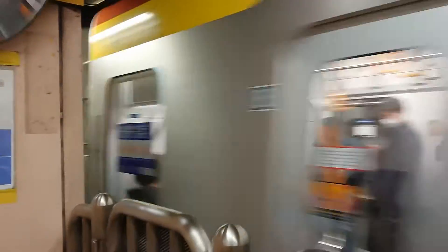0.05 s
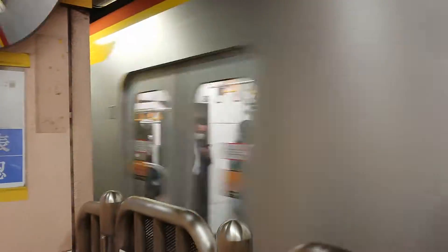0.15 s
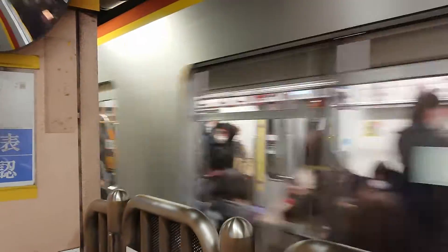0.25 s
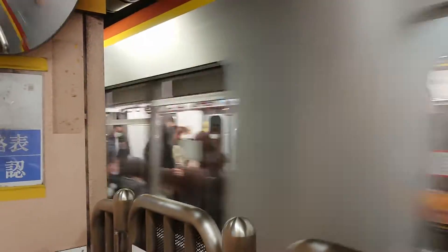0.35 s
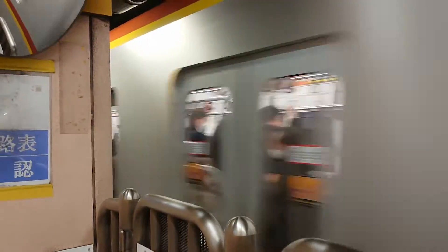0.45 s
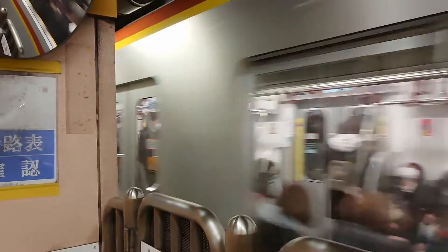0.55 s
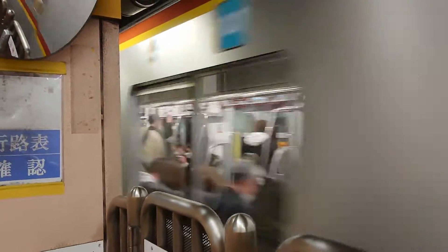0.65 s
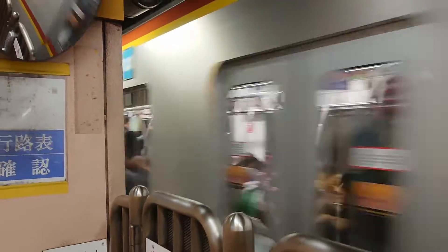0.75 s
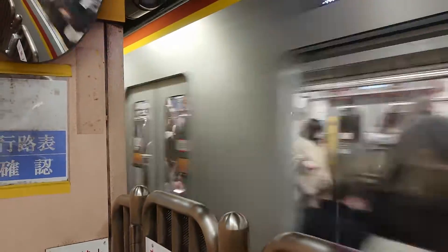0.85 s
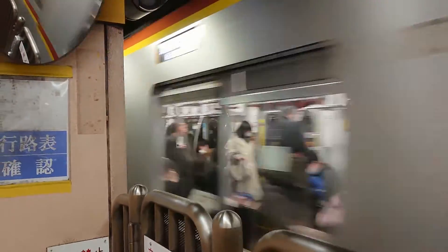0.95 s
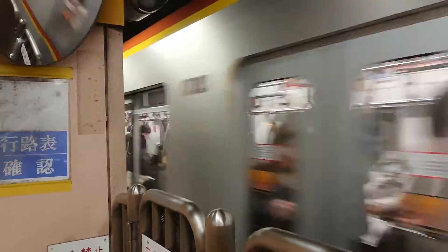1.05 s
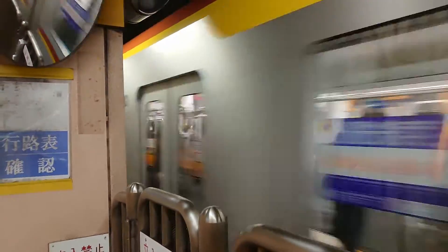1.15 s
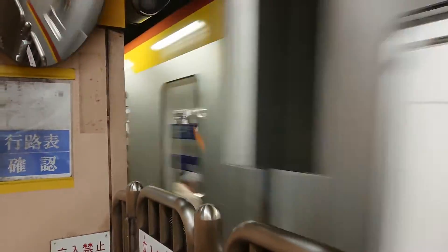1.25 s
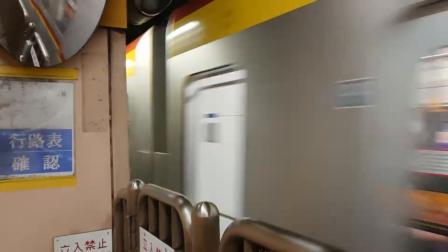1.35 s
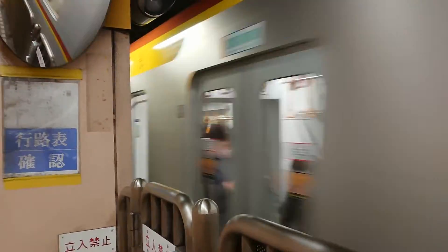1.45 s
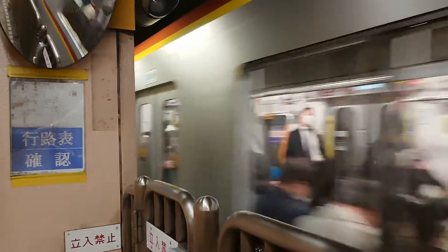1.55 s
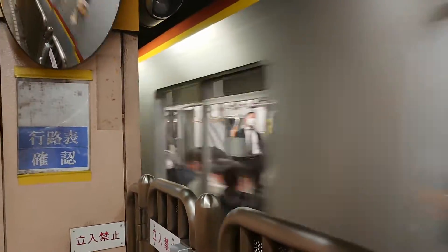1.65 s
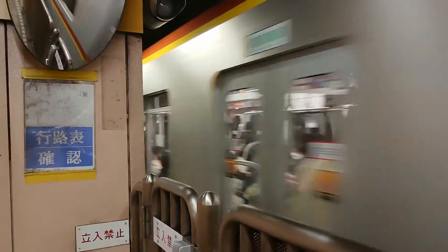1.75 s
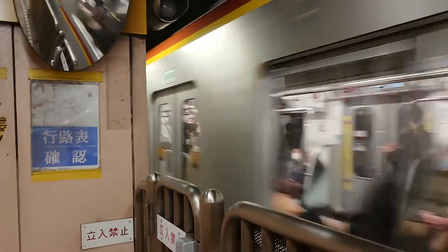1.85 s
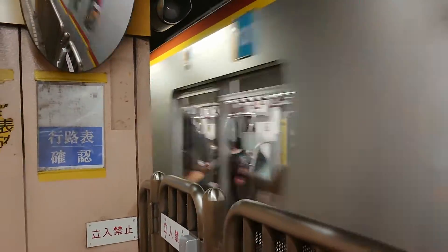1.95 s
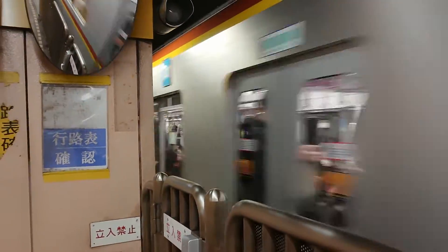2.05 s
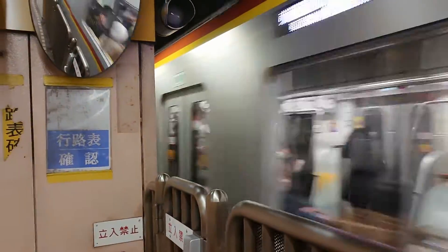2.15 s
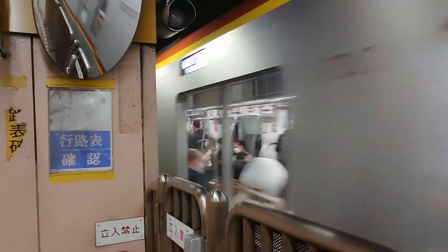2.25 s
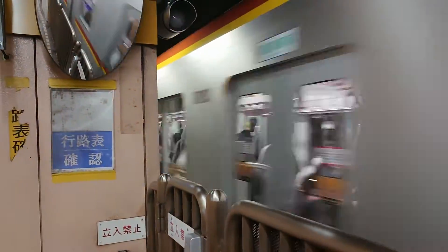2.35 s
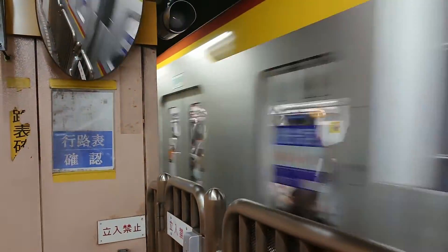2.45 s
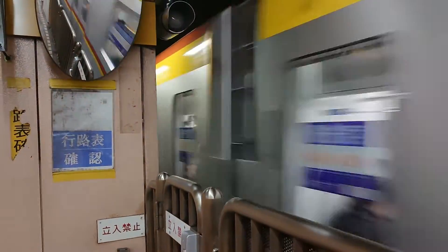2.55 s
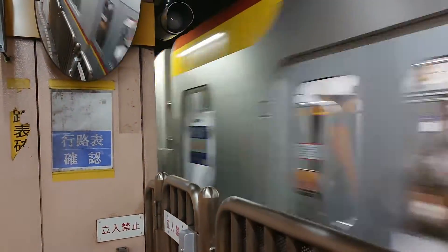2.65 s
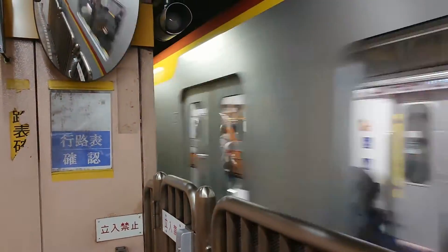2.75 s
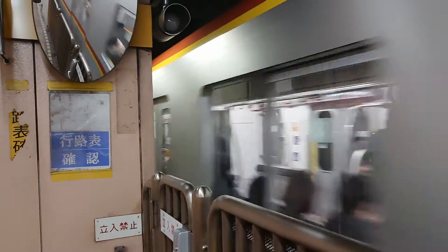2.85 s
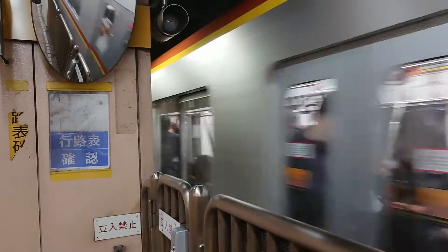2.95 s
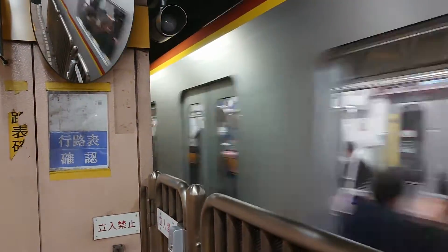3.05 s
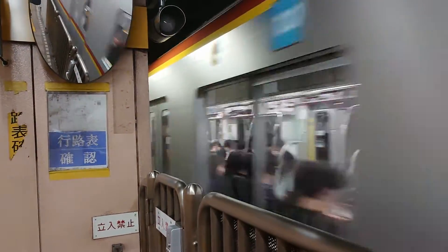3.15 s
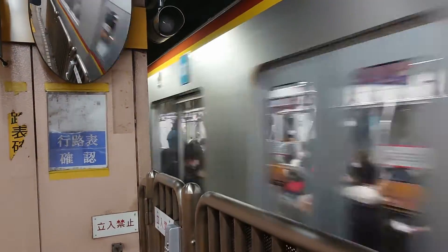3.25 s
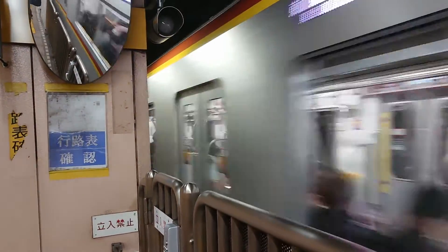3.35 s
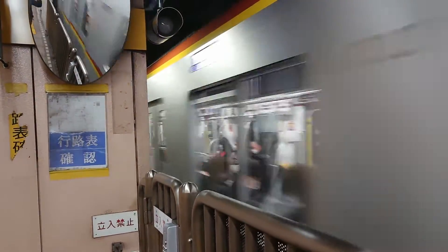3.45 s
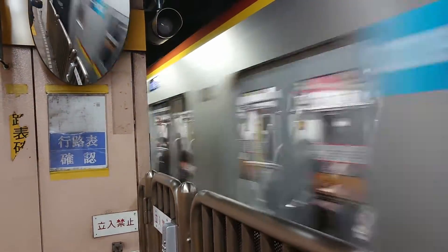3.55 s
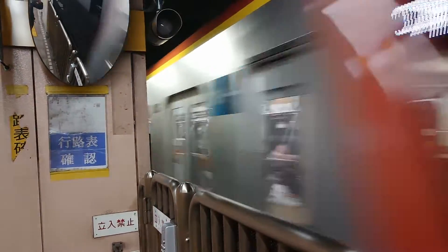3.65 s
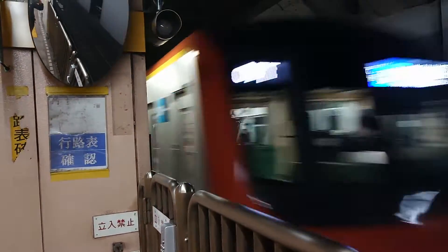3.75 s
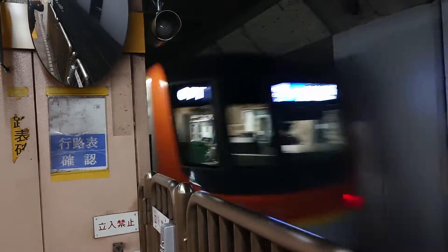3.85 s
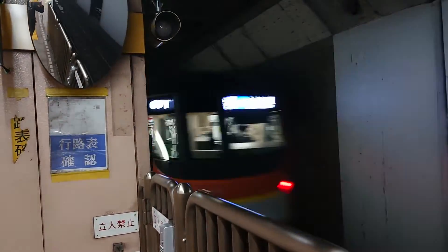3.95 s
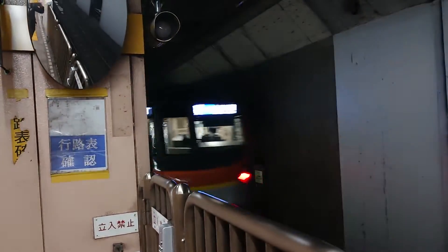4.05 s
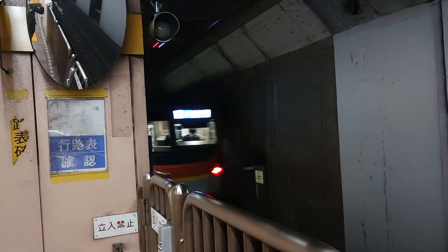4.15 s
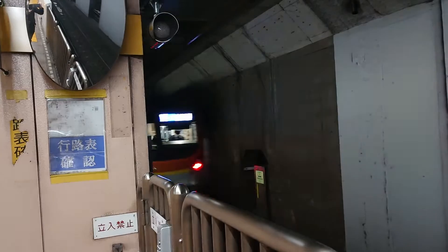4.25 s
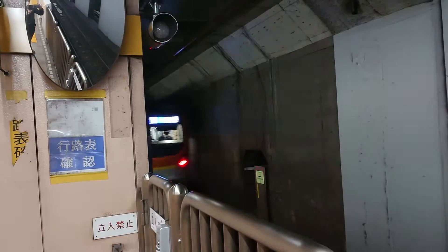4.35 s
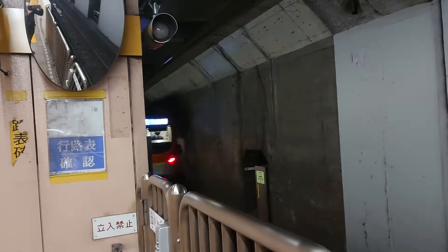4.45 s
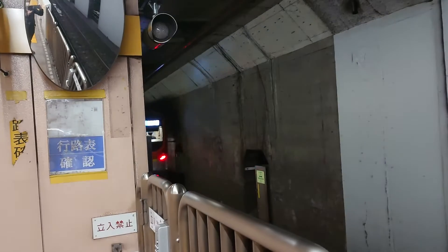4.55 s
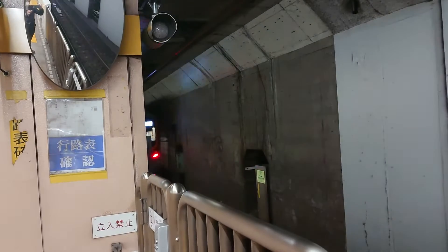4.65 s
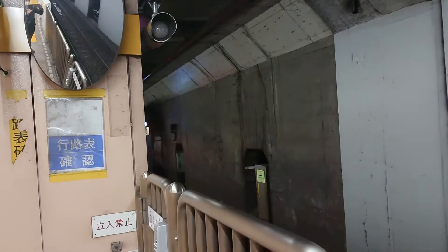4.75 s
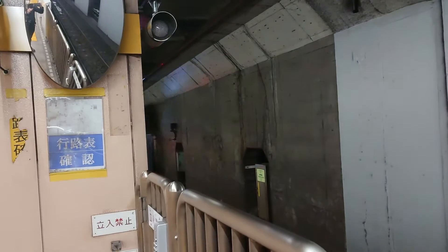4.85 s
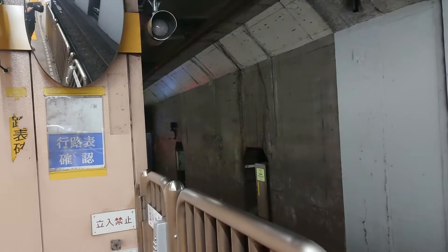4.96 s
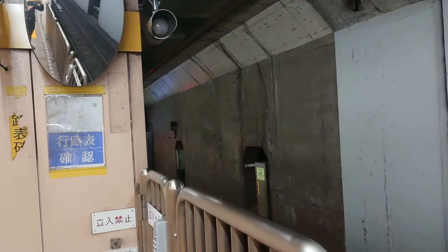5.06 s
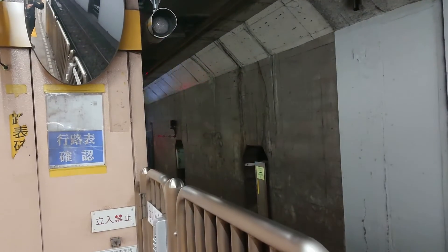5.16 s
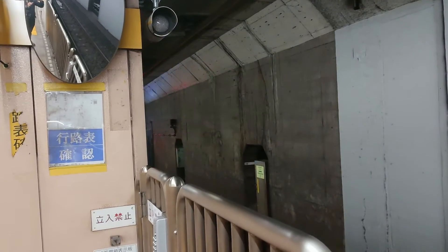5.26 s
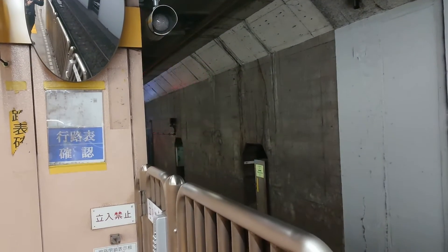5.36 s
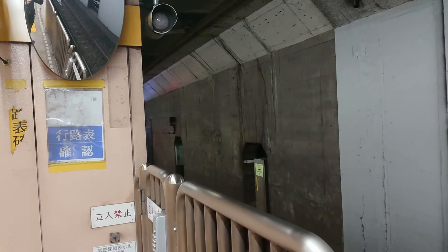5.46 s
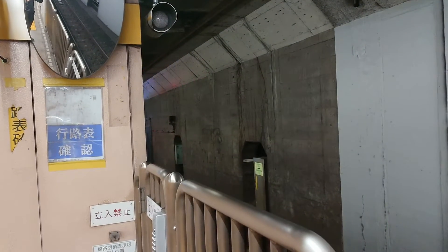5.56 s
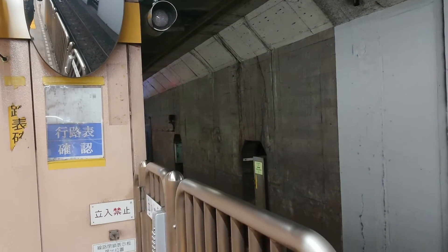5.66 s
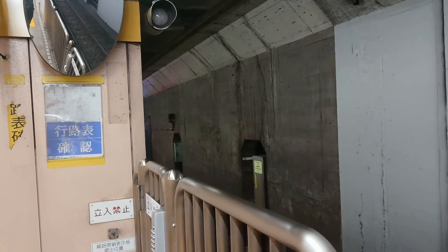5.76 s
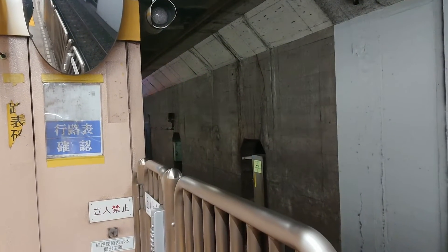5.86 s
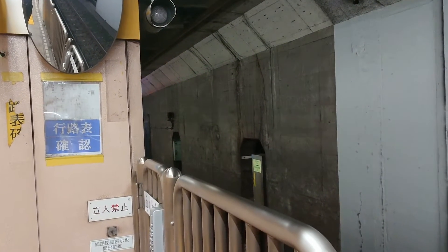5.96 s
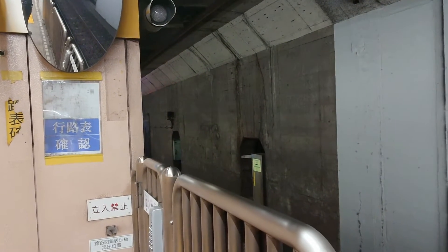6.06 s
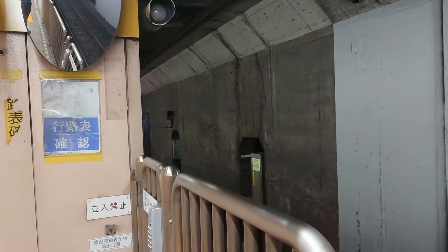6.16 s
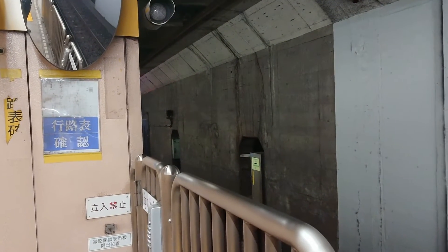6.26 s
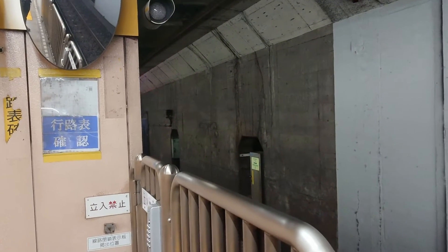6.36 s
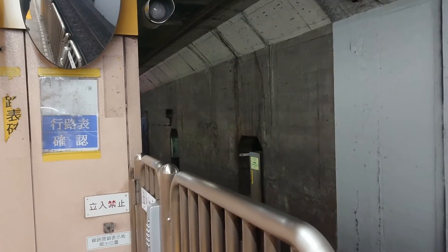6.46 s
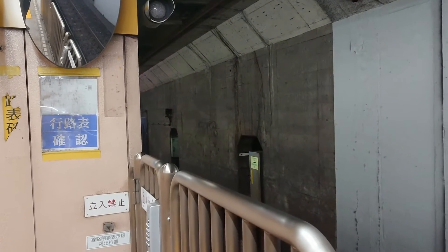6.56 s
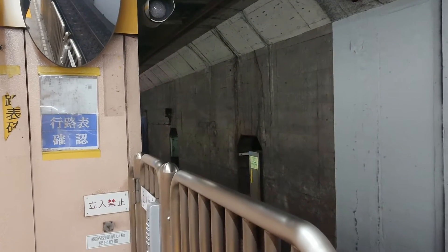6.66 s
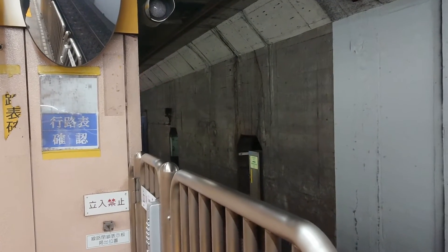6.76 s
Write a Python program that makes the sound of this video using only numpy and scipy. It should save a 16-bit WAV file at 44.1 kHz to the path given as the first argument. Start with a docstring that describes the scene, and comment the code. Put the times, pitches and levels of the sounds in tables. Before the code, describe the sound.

From the start, a subway train rolls close past an underground platform with a loud rumble, a roar of car bodies and a metallic ring of wheels on rails. A low hum wavers beneath, steps up in pitch at about 1.7 seconds and fades by 3.5. Air hisses in bursts at the opening and again between 2 and 3 seconds, with a few quick wheel clacks from 2.4 to 2.9. From about 1 second, the train's draught thumps irregularly on the phone microphone. After 4 seconds the train fades gradually into the tunnel, its ring sinking slightly while the echo stays higher. The wind continues, with sharp low buffets and knocks on the left from 4.2 seconds, crowding together near the end. At about 4.3 and, more deeply, 6.2 seconds, the train sound drops suddenly and creeps back, still rumbling faintly at 6.8.

```python
"""A subway train rolls past the end of an underground platform and fades into its tunnel, heard on a phone.
Rough wheels on rough rails make bogies rumble, car bodies roar and wheel discs ring; the wheels clack,
a hum wavers below, air hisses round the cars in bursts. The train's draught buffets the two microphone
ports; at two of the buffets the train, hum and hiss drop suddenly in level and creep back."""
import sys
import numpy as np
from scipy import signal
from scipy.fft import rfft, irfft
from scipy.io import wavfile
from scipy.ndimage import uniform_filter1d, minimum_filter1d

SR = 44100
rng = np.random.default_rng(int(sys.argv[2]) if len(sys.argv) > 2 else 0)


def wav_out(sig):
    """Save sig, one row per channel (or a flat mono array), as 16-bit PCM at SR to the path in sys.argv[1]."""
    wavfile.write(sys.argv[1], SR, np.round(np.clip(np.atleast_2d(sig).T, -1, 1) * 32767).astype(np.int16))


N = 300762

# The cars pass and run off. Each row: time in seconds, gains in dB of car bodies, wheel ring and rails,
# lowest ring over the others in dB.
TRAIN_LEVELS = [(0, -21.5, -41.5, -31.5, -6.5), (.6, -22.5, -38.5, -30.5, -8.5),
                (1.2, -21, -44.5, -30, -3.5), (1.7, -20.5, -35.5, -29.5, -4.5), (2.3, -20, -42.5, -29, 4),
                (2.8, -21, -37.5, -27, 4.5), (3.4, -23, -35.5, -29.5, 4.5), (4, -24.5, -34, -31, 3.5),
                (4.6, -28, -38, -34.5, 5), (5.2, -30, -39, -39, 1), (5.5, -31.5, -39.5, -41, 2.5),
                (5.9, -35, -45.5, -43.5, 6), (6.3, -33.5, -45.5, -50, 5.5), (6.82, -34, -41.5, -51, 1.5)]
# Wheel disc resonances. Each row: frequency in Hz, width in Hz, level in dB.
WHEEL_MODES = [(1290, 200, 3), (1913, 230, -0.5), (2700, 170, -3.5), (3720, 280, -13.5), (4450, 300, -21)]


def undb(db):
    """Gain of a level in dB."""
    return 10 ** (np.asarray(db) / 20)


def unit(x):
    """Scaled to rms 1."""
    return x / np.sqrt(np.mean(x ** 2))


def over_hz(table):
    """(Hz, value) rows at every FFT bin."""
    hz, value = np.transpose(table)
    return np.interp(np.log(np.fft.rfftfreq(N, 1 / SR) + 1), np.log(hz), value)


def over_time(rows):
    """The columns of (seconds, ..) rows at every sample."""
    times_s, *columns = np.transpose(rows)
    return [np.interp(np.arange(N) / SR, times_s, column) for column in columns]


def butter(x, order, hz, kind="bandpass"):
    """x through a Butterworth filter."""
    return signal.sosfilt(signal.butter(order, hz, kind, fs=SR, output="sos"), x)


def walk(rate_hz):
    """Random levels, held and smoothed twice; spread near 1."""
    hold = int(SR / rate_hz)
    steps = np.repeat(rng.standard_normal(N // hold + 1), hold)
    return 1.24 * uniform_filter1d(uniform_filter1d(steps, hold), hold)[:N]


def swell(peak_s, peak_db, length_s):
    """A Gaussian rise and fall."""
    out = np.zeros(N)
    near = np.arange(max(int((peak_s - 2 * length_s) * SR), 0), min(int((peak_s + 2 * length_s) * SR), N))
    out[near] = undb(peak_db) * np.exp(-((near / SR - peak_s) / (length_s / 2)) ** 2)
    return out


def resonances(modes):
    """Gain of steep resonances whose powers add, with the treble cut off above about 6 kHz."""
    hz = np.fft.rfftfreq(N, 1 / SR) + 1
    power = sum((undb(db) / (1 + ((hz - mode_hz ** 2 / hz) / width_hz) ** 2)) ** 2
                for mode_hz, width_hz, db in modes)
    return np.sqrt(power / (1 + (hz / 6200) ** 16))


def station_noise(colour, flicker_db, rate_hz):
    """Flickering noise at rms 1: bass alike at both ports, treble diffuse, the right port first."""
    # Coherence of the ports. Each row: frequency in Hz, likeness from 0 to 1.
    coherence = [(60, 1), (120, 0.94), (230, 0.93), (440, 0.8), (860, 0.44), (1680, 0), (3270, 0.03),
                 (6360, 0)]
    # Balance of the ports. Each row: frequency in Hz, left minus right in dB.
    balance = [(60, -1.0), (100, -1.5), (170, -1.0), (280, -2.0), (480, -2.0), (800, -3.0), (1340, -3.5),
               (2260, -4.0), (3790, -1.0), (6360, -4.5)]
    left_lag_s = .00016
    mid, side = rfft(rng.standard_normal((2, N)) * undb(flicker_db * walk(rate_hz)))
    likeness = np.clip(over_hz(coherence), 0, .99)
    mid, side = mid * np.sqrt(1 + likeness), side * np.sqrt(1 - likeness)
    lag = np.exp(-2j * np.pi * np.fft.rfftfreq(N, 1 / SR) * left_lag_s)
    lean = undb(over_hz(balance) / 2)
    return unit(irfft(colour * np.array([(mid + side) * lean * lag, (mid - side) / lean]), N))


def receding(ring):
    """The wheel ring sinks in pitch as the train recedes, while its tunnel echo stays higher."""
    # Each row: time in seconds, pitch factors of the direct ring and its echo, relative waver.
    doppler = [(0, 1, 1, .018), (2.9, 1, 1, .012), (3.8, .995, 1, .01), (4.6, .965, .995, .018),
               (6, .94, 1.0, .02), (6.82, .93, 1.03, .025)]
    direct, echo, waver = over_time(doppler)
    out = np.zeros((2, N))
    for speed, offset in ((direct, 0), (echo, N // 2)):
        position = (np.cumsum(speed * (1 + waver * walk(5))) + offset) % (N - 1)
        out += [np.interp(position, np.arange(N), port) for port in ring]
    return out / np.sqrt(2)


def train():
    """Rough wheels on rough rails shake bogies, car bodies, wheel discs, track and ground."""
    # Resonances. Each row: frequency in Hz, width in Hz, level in dB.
    bogie_modes = [(126.6, 44, -0.5), (150.2, 27, 0), (188, 40, -2.5), (221.4, 64, -1.5), (266, 37, -9.5)]
    body_modes = [(325, 101, 4), (472, 172, 2), (605, 316, -2.5), (960, 1610, -16.5)]
    ground_modes = [(62.9, 25, 1), (87, 41, -7)]
    # Rail noise spectrum. Each row: frequency in Hz, level in dB.
    rail_spectrum = [(410, -39), (700, -2.5), (877, -4), (1120, -3), (1220, -8.5), (1610, -8), (1960, -4),
                     (2400, -8.5), (2760, -9.5), (3190, -19), (4500, -17.5), (5850, -27.5), (9900, -120)]
    # Bogie rumble. Each row: time in seconds, gain over the car bodies in dB.
    bogie_boost = [(0, 2.5), (.7, 4), (1.3, 5.5), (2, 4), (3, 4.5), (3.6, 3.5), (4.5, 3.5), (6.82, 3.5)]
    body_db, ring_db, rail_db, lowest_db = over_time(TRAIN_LEVELS)
    ground_db = -23.5 + .67 * (body_db - body_db[0])  # fades less than the cars
    rumble = station_noise(resonances(bogie_modes), flicker_db=.6, rate_hz=9)
    low_roar = station_noise(resonances(body_modes[:1]), flicker_db=1.2, rate_hz=7)
    high_roar = station_noise(resonances(body_modes[1:]), flicker_db=.5, rate_hz=12)
    cars = undb(over_time(bogie_boost)[0]) * rumble + undb(-4) * low_roar + undb(-1.5) * high_roar
    lowest_ring = station_noise(resonances(WHEEL_MODES[:1]), flicker_db=.5, rate_hz=7)
    upper_rings = station_noise(resonances(WHEEL_MODES[1:]), flicker_db=2.5, rate_hz=11)
    ring = receding(undb(lowest_db) * lowest_ring + upper_rings)
    rail = station_noise(undb(over_hz(rail_spectrum)), flicker_db=.4, rate_hz=8)
    ground = station_noise(resonances(ground_modes), flicker_db=1.5, rate_hz=6)
    return undb(body_db) * cars + undb(ring_db) * ring + undb(rail_db) * rail + undb(ground_db) * ground


def hum(width_hz=8, steady=.9):
    """A narrow wavering tone that steps up as the cars change, alike at both ports."""
    # Each row: time in seconds, centre in Hz, level in dB.
    hum_track = [(0, 144.7, -17), (.5, 143, -20.5), (1.1, 141.3, -31.5), (1.45, 150, -35),
                 (1.75, 164.3, -20), (2.05, 167.8, -24.5), (2.3, 167.2, -20), (2.55, 167.7, -28),
                 (2.8, 166, -17), (3, 167, -23), (3.2, 164.7, -19.5), (3.4, 166.3, -39), (3.7, 168, -49),
                 (6.82, 164, -56)]
    hz, db = over_time(hum_track)
    waver = unit(butter(rng.standard_normal((2, N)), 2, width_hz, "lowpass"))
    phase = 2 * np.pi * np.cumsum(hz) / SR
    return undb(db) * unit((steady + waver[0]) * np.cos(phase) + waver[1] * np.sin(phase))


def hiss():
    """Air rushes round the cars and swells in bursts; its top fizzes, louder on the left."""
    # Spectra. Each row: frequency in Hz, level in dB.
    air_spectrum = [(1700, -29.5), (2300, -6), (2700, -7.5), (3150, -7.5), (3700, -4.5), (4050, -10),
                    (5400, -11.5), (6250, -16), (6900, -25), (7500, -49.5)]
    fizz_spectrum = [(7300, -39.5), (7700, -6.5), (8400, -1), (9100, -6.5), (10200, -3.5), (11500, -8.5),
                     (12500, -22.5), (13500, -30.5)]
    # Bursts of air. Each row: peak time in seconds, peak in dB, length in seconds.
    air_bursts = [(0.026, -36, 0.23), (0.156, -41, .16), (0.294, -36, 0.19), (1.65, -40, 0.15),
                  (2.139, -36.5, 0.15), (2.42, -32, 0.27), (2.56, -31, 0.2), (2.702, -35, 0.19),
                  (2.73, -39, .03), (2.09, -43, .04), (2.891, -40.5, 0.18)]
    rail_db = over_time(TRAIN_LEVELS)[2]
    steady = undb(rail_db - 10.5)
    bursts = np.sqrt(sum(swell(*row) ** 2 for row in air_bursts))
    air = station_noise(undb(over_hz(air_spectrum)), flicker_db=.6, rate_hz=18)
    fizz = station_noise(undb(over_hz(fizz_spectrum)), flicker_db=1, rate_hz=20) * undb([[3.2], [-3.2]])
    fizz_gain = undb(-25) * np.hypot(steady, undb(3) * bursts)  # bursts fizz more than steady air
    return np.hypot(steady, bursts) * air + fizz_gain * fizz


def draught():
    """Eddies thump each port on its own; strong eddies have steeper edges and sound brighter."""
    # Each row: frequency in Hz, level in dB.
    eddy_spectrum = [(18, -72.5), (30, -36), (45, -8), (62, 2.5), (85, -4.5), (120, -7.5), (200, -12.5),
                     (400, -35.5), (800, -77.5), (4000, -120)]
    # Each row: peak time in seconds, gain in dB, length in seconds, left minus right in dB.
    gusts = [(.36, -37, .1, 13), (.62, -40, 0.12, 4), (1.06, -18, 0.1, -10), (1.201, -24.5, 0.072, -19),
             (1.288, -19, 0.097, -7), (1.683, -36, 0.1, 6), (1.94, -28, 0.065, 5), (2.075, -15, 0.054, 4),
             (2.27, -24, 0.052, -1), (2.58, -18, 0.2, 0), (2.9, -17.5, 0.098, -5), (3.19, -32.5, 0.091, -4),
             (3.286, -14.5, 0.065, 1), (3.757, -33, 0.069, 8), (3.876, -22, 0.078, 6),
             (4.078, -13, 0.13, -10.5), (4.248, -14, 0.11, 6.5), (4.495, -23, 0.24, 6),
             (4.874, -23.5, 0.046, 10), (5.062, -17, 0.1, 5), (5.234, -23, 0.17, 6.5),
             (5.64, -25.5, 0.14, 19.5), (5.913, -23, 0.084, 22), (6.203, -21.5, 0.16, 8.5),
             (6.349, -24.5, 0.15, 11.5), (6.613, -21.5, 0.038, 16.5), (6.722, -20.5, 0.017, 16),
             (6.735, -21.5, 0.047, 13), (6.82, -16.5, 0.064, 10)]
    # Breeze, growing in the wake. Each row: time in seconds, gain in dB, left minus right in dB.
    breeze_track = [(0, -49, 6), (1, -32.5, 5), (2.5, -31.5, -0.5), (3.9, -33, 13), (4.5, -28.5, 5.5),
                    (5.4, -35, 3.5), (6, -24, 11.5), (6.45, -30.5, 9), (6.82, -24.5, 6)]
    wander_db, sides = 3, np.array([[.5], [-.5]])
    eddies = rng.standard_normal((2, N)) * undb([1.5 * walk(25), 1.5 * walk(25)])
    thump = unit(irfft(rfft(eddies) * undb(over_hz(eddy_spectrum)), N))
    thump = unit(np.tanh(thump / 3.8))  # the diaphragm swings only so far
    breeze_db, lean_db = over_time(breeze_track)
    breeze = undb(breeze_db + sides * lean_db + wander_db * np.array([walk(24), walk(11)]))
    gust_power = sum((swell(peak_s, db, length_s) * undb(sides * pan_db)) ** 2
                     for peak_s, db, length_s, pan_db in gusts)
    gain = np.sqrt(breeze ** 2 + gust_power)
    rustle = unit(butter(rng.standard_normal((2, N)) * np.abs(thump), 3, [110, 480]))
    return gain * (thump + gain * rustle)


def clacks(rise_s=.003, decay_s=.0049):
    """Short blows set the wheel discs ringing."""
    # Each row: start in seconds, gain in dB.
    blows = [(2.422, -21), (2.436, -19.5), (2.485, -20), (2.719, -22), (2.726, -26), (2.857, -31)]
    t = np.arange(N) / SR
    envelope = sum(undb(db) * np.clip((t - start_s) / rise_s, 0, 1) * np.exp(-abs(t - start_s) / decay_s)
                   for start_s, db in blows)
    colour = resonances(WHEEL_MODES[1:]) * over_hz([(1500, .5), (4500, 2)])
    return envelope * station_noise(colour, flicker_db=0, rate_hz=20)


def buffets(sag_hz=410):
    """Short damped swings of the left diaphragm that sag in pitch, each with a knock at its front."""
    # Each row: start in seconds, gain in dB, starting pitch in Hz, 60 dB decay in seconds,
    # swing factor (positive: outward first), knock peak in dB, knock pitch in Hz.
    hits = [(4.245, -1.5, 90, 0.13, 1, -18, 240), (4.93, -22, 200, 0.034, 0.82, -25, 900),
            (5.037, -1, 138, 0.056, 0.88, -25, 360), (5.118, -1, 140, 0.028, -0.86, -20, 370),
            (5.305, -1.5, 138, 0.021, 0.91, -27, 393), (5.581, -4, 109, 0.07, 0.94, -26, 300),
            (5.667, -4.5, 100, 0.087, 1, -35, 260), (5.697, -8, 150, 0.05, 1, -23, 400),
            (5.876, -8, 90, 0.06, 1, -35, 250), (5.896, 2.5, 110, 0.057, 0.66, -36, 290),
            (5.948, -6, 148, 0.025, 1, -20, 378), (6.2325, -1, 490, .2, -1, -14, 800),
            (6.353, -4.5, 114, 0.22, 0.8, -42, 290), (6.6, -9, 200, 0.045, 0.86, -26, 597),
            (6.618, -17, 220, 0.027, -0.98, -29, 700), (6.626, -10, 130, 0.017, 0.7, -29, 500),
            (6.633, -5, 330, 0.008, -1.32, -37, 805), (6.6958, 0, 175, 0.045, 1, -27, 550),
            (6.704, -8.5, 200, .03, 1, -32, 654), (6.734, -3, 290, 0.009, 1, -18, 790),
            (6.749, -10, 220, .03, 1, -29, 700), (6.779, -1.5, 165, 0.04, 1, -36, 600)]
    out, t = np.zeros((2, N)), np.arange(SR // 5) / SR
    for start_s, db, hz, t60_s, factor, knock_db, knock_hz in hits:
        speed = hz / 500  # slower swings rise more gently, square off less and tick far more softly
        phase = 2 * np.pi * sag_hz / hz * np.log1p(hz * hz / sag_hz * t)
        rise = 1 - np.exp(-speed * (t / .0006) ** 2)
        swing = np.sin(phase) * np.exp(-np.log(1000) * t / t60_s) * rise
        swing = np.tanh(1.5 * speed ** 2 * swing)
        noise = rng.standard_normal(len(t))
        knock = butter(noise * t * np.exp(-t / .002), 3, [.6 * knock_hz, 1.15 * knock_hz])
        tick = butter(noise * t * np.exp(-t / .0017), 2, [1000, 2700])
        hit = factor * undb(db) * swing / np.abs(swing).max()
        hit += undb(knock_db) * knock / np.abs(knock).max()
        hit += undb(db - 19) * speed ** 6 * tick / np.abs(tick).max()
        start = int(start_s * SR)
        out[0, start:start + len(t)] += hit[:N - start]
    return out


def level_drops(fall_s=.013, recover_s=.93):
    """Gain that falls suddenly at set times and creeps back."""
    # Each row: time in seconds, depth in dB.
    drops = [(4.269, 3), (6.232, 8)]
    t = np.arange(N) / SR
    return undb(-sum(db * np.clip((t - at_s) / fall_s + .5, 0, 1) * np.exp(-abs(t - at_s) / recover_s)
                     for at_s, db in drops))


def scene():
    """Train, hum and hiss under the level drops, plus draught, buffets and clacks."""
    return level_drops() * (train() + hum() + hiss()) + draught() + buffets() + clacks()


def record(dry):
    """The deepest bass is cut, a limiter holds the loudest peaks, then the top is cut."""
    bottom_hz, ceiling, top_hz = 42, .887, 13400
    dry = butter(dry, 3, bottom_hz, "highpass")
    gain = np.minimum(1, ceiling / (np.abs(dry) + 1e-9))
    gain = minimum_filter1d(gain, size=401)
    gain = uniform_filter1d(uniform_filter1d(gain, size=200), size=200)
    return signal.sosfilt(signal.ellip(8, .2, 70, top_hz, fs=SR, output="sos"), gain * dry)


dry = scene()
out = record(dry)
wav_out(out)
```